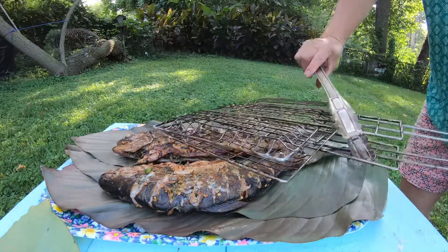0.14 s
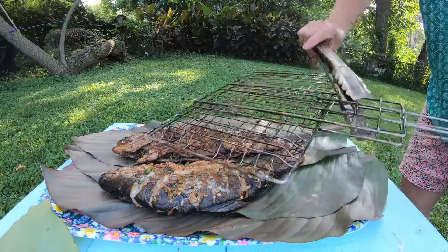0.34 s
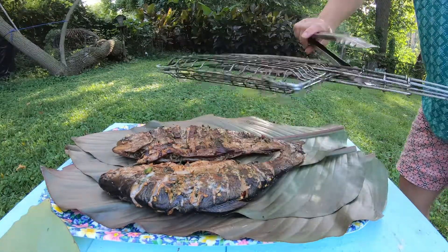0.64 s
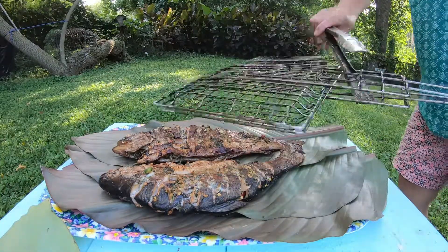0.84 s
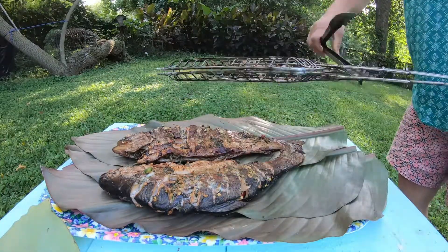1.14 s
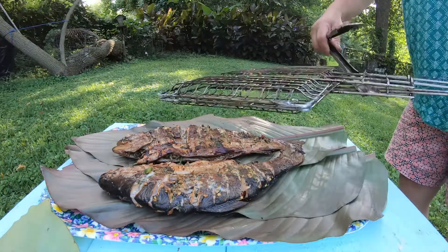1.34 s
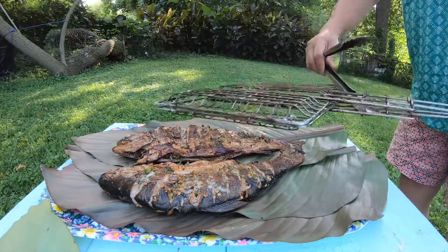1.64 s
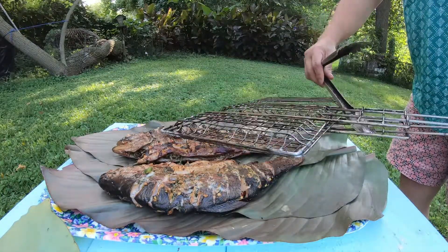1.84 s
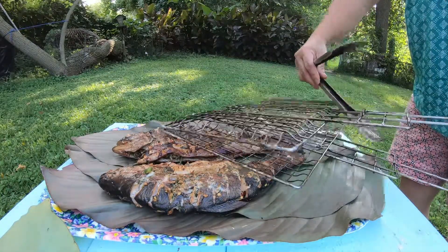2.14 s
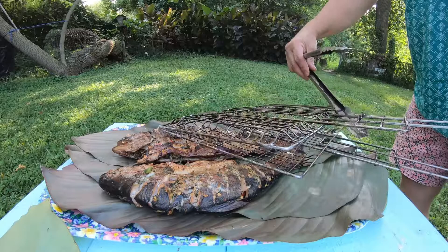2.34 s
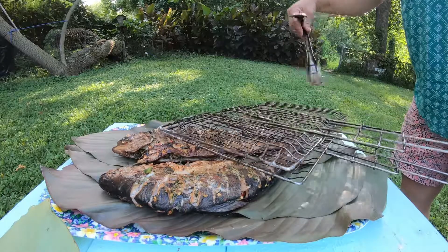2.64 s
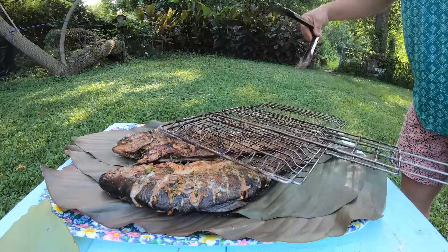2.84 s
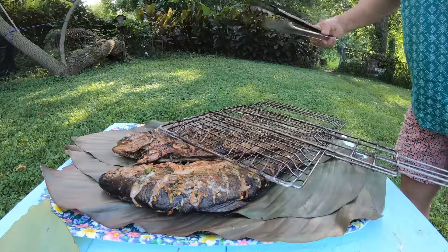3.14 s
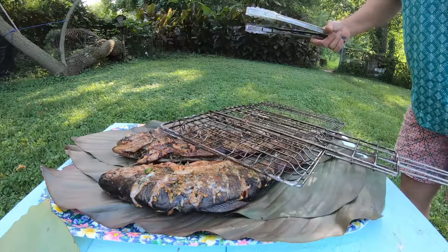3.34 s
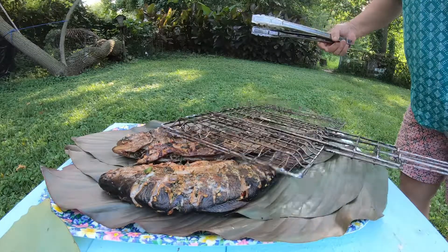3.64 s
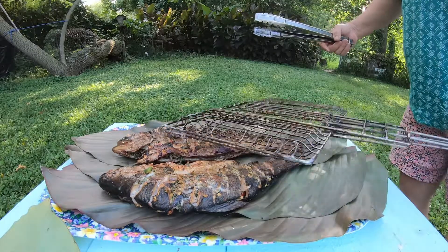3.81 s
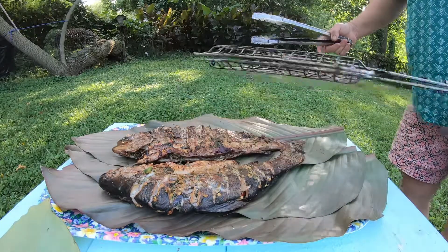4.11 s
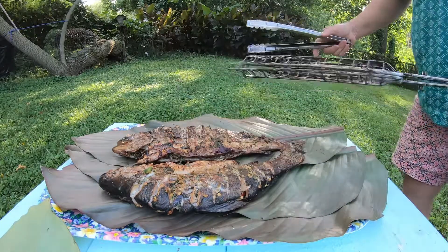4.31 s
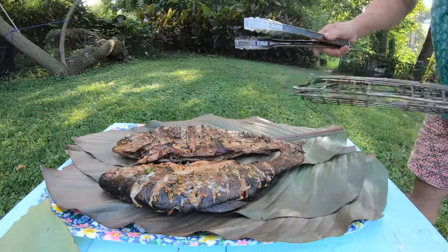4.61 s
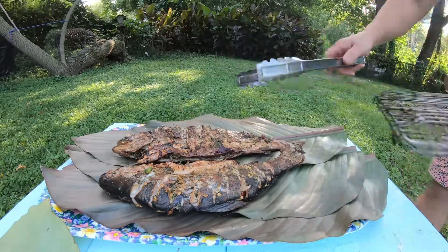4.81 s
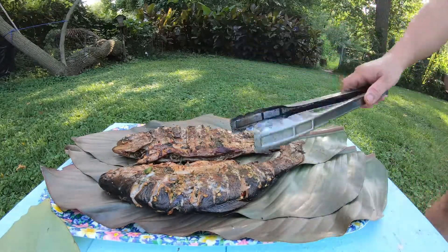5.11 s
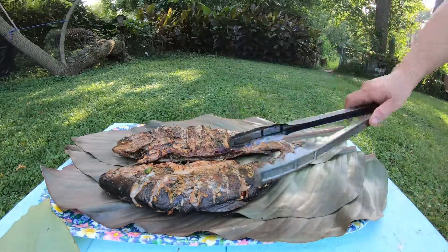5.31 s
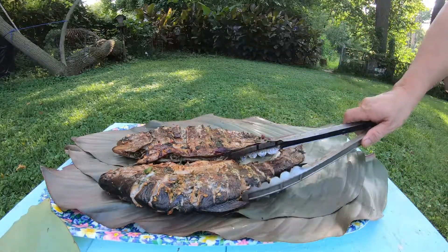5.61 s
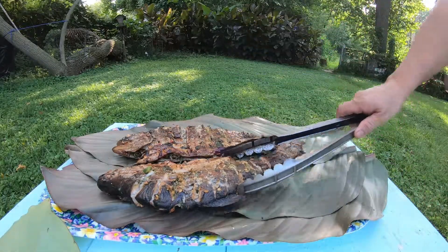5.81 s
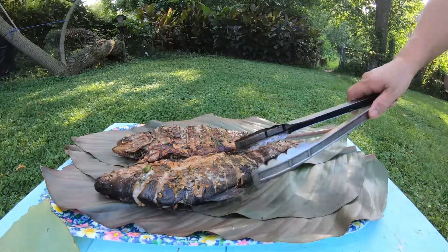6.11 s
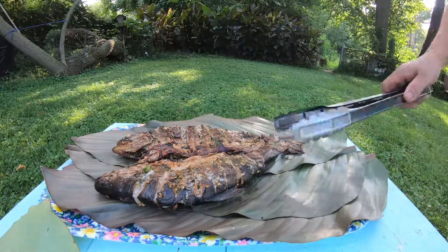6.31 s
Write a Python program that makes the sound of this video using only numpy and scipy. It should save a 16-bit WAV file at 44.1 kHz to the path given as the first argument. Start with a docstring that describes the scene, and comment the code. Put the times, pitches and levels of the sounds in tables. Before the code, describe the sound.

Outdoors on a lawn, a steady high insect drone and a nearer fast trill. Close by, steel tongs click and scrape dryly on a wire basket; around two seconds the basket drops with a rattling clank and a low table thump. Small ticks and leafy crackles follow, ending quietly.

```python
"""Steel tongs click and scrape on a wire grilling basket: noise bursts ring arm modes, stick-slip grit sings.
The basket clatters (knocks into wire modes), the table booms (decaying sines), and leaves and fish skin
crackle (shaped grains). Behind them a high insect chorus drones (coloured noise), a nearer insect trills
(swept sine), a low distant rumble lies under both, and gusts push on the microphone (low noise)."""
import sys
import numpy as np
from scipy import signal
from scipy.fft import rfft, irfft
from scipy.io import wavfile
from scipy.ndimage import uniform_filter1d

SR = 44100
rng = np.random.default_rng(int(sys.argv[2]) if len(sys.argv) > 2 else 0)


def persist_wave(psi):
    """Save psi, clipped to +-1, as 16-bit WAV."""
    counts = np.round(np.clip(psi, -1, 1) * 32767).astype(np.int16)
    wavfile.write(sys.argv[1], SR, np.atleast_2d(counts).T)


N = 284886
TIME = np.arange(N) / SR

# basket knocking and settling: t/s, relative level/dB, colour centre f/Hz, chatter decay/s
BASKET_KNOCKS = [(1.905, -36.5, 540, 0.036), (1.9484, -26, 2000, 0.038), (1.9706, -9, 2320, 0.0087),
                 (1.978, -15.5, 1760, 0.011), (1.988, -26, 1800, 0.041), (2.019, -18.5, 1710, 0.0081),
                 (2.022, -18.5, 11000, 0.014), (2.071, -29, 434, 0.01), (2.195, -35.5, 4220, 0.019),
                 (3.311, -31.5, 1500, 0.028), (3.514, -39.5, 1420, 0.026), (3.543, -29, 2260, 0.016),
                 (3.668, -27.5, 3450, 0.0064), (4.262, -48, 2480, 0.019)]
# steel response: f/Hz, relative level/dB
STEEL_RESPONSE = [(300, -9), (1200, -3.5), (2400, -6.5), (3600, -4.5), (4700, -4.5), (6500, -2), (8300, -1),
                  (10000, -4), (11500, -9.5), (13000, -9.5), (16000, -15)]


def undb(db):
    """Decibels to gain."""
    return 10 ** (np.asarray(db) / 20)


def unit(x):
    """Scale to rms 1."""
    return x / np.sqrt(np.mean(x ** 2))


def curve(rows, at=TIME, axis=1):
    """One table column, joined by straight lines."""
    rows = np.array(rows)
    return np.interp(at, rows[:, 0], rows[:, axis])


def over_hz(points):
    """A (f/Hz, value) table on every frequency bin, joined on a log axis."""
    hz, value = np.transpose(points)
    bins_hz = np.arange(N // 2 + 1) * SR / N
    return np.interp(np.log(bins_hz + 1), np.log(hz), value)


def tint(x, points):
    """Filter by a (f/Hz, level/dB) response."""
    return irfft(rfft(x) * undb(over_hz(points)), N)


def colour(x, points):
    """Filter by a (f/Hz, level/dB) response, then scale to rms 1."""
    return unit(tint(x, points))


def band(x, hz, width_hz):
    """One resonance, gain 1 at its centre."""
    hz = min(hz, SR * .45)
    b, a = signal.iirpeak(hz, hz / min(width_hz, SR / 3), fs=SR)
    return signal.lfilter(b, a, x)


def walk(rate_hz):
    """Slow chance: random levels joined by ramps, at rms 1."""
    levels = rng.standard_normal(int(N / SR * rate_hz) + 2)
    steps = np.repeat(levels, int(SR / rate_hz) + 1)
    return unit(uniform_filter1d(steps, int(SR / rate_hz))[:N])


def stereo_noise(likeness):
    """Noise whose left-right correlation depends on frequency."""
    alike = np.clip(over_hz(likeness), -1, 1)
    mid, side = rfft(rng.standard_normal((2, N))) * np.sqrt([1 + alike, 1 - alike])
    return irfft(np.array([mid + side, mid - side]), N)


def spread(pair, side_db, pan_db=0):
    """Middle and side signals to left and right; positive pan favours the left."""
    mid, side = pair[0], pair[1] * undb(side_db)
    return np.array([(mid + side) * undb(pan_db / 2), (mid - side) * undb(-pan_db / 2)])


def grains(shape, scatter_db):
    """Dense tiny contacts; a larger scatter makes a few far stronger than the rest."""
    noise = rng.standard_normal(shape)
    strength_db = scatter_db * np.minimum(rng.exponential(size=shape), 5)
    return unit(noise * undb(strength_db))


def swell(s, length_s, flatness):
    """Smooth rise and fall; flatness 2 is a bell, higher is flatter."""
    return np.exp(-np.abs(2 * (TIME - s) / length_s - 1) ** flatness / 2)


def push(s, length_s, attack_s, release_s):
    """Linear attack, hold and exponential release."""
    attack = np.clip((TIME - s) / attack_s, 0, 1)
    return attack * np.exp(-np.maximum(TIME - s - length_s, 0) / release_s)


def add(out, s, sound):
    """Mix a sound in at time s."""
    start = max(int(s * SR), 0)
    out[:, start:start + sound.shape[-1]] += sound[..., :N - start]


def ring(force, modes, ring_db):
    """The contact noise itself plus the decaying modes it excites."""
    t = TIME[:SR // 2]
    modal = sum(undb(db - 60 * t / t60_s) * np.cos(2 * np.pi * hz * t) for hz, db, t60_s in modes)
    response = modal * undb(ring_db) / np.linalg.norm(modal)
    return force + signal.fftconvolve(force, response[None], axes=1)[:, :N]


def blows(events, scatter_db, breadth, tail_db, tail_s):
    """Each blow is a burst of metal chatter that stops short and leaves a faint loose rattle."""
    out, t = np.zeros((2, N)), TIME[:SR // 6]
    for s, db, hz, decay_s in events:
        envelope = np.exp(-(t / decay_s) ** 3) + undb(tail_db) * np.exp(-t / tail_s)
        burst = band(grains((2, len(t)), scatter_db) * envelope, hz, hz * breadth)
        burst = band(burst, hz, 2 * hz * breadth)
        norm = np.linalg.norm(burst, axis=1, keepdims=True)
        add(out, s, undb(db) * burst * np.sqrt(decay_s * SR) / norm)
    return out


def distance():
    """Low-passed noise rumbles with a wavering narrow-band hum, under faint steady open air."""
    # spectrum: f/Hz, relative density/dB
    air_spectrum = [(20, -27.5), (35, -20), (55, -1.5), (90, 1), (125, 1.5), (160, -2.5), (230, -9.5),
                    (320, -19), (500, -31), (800, -20.5), (1030, -29.5), (1330, -26), (2300, -39.5),
                    (3600, -29), (6000, -35), (15000, -42)]
    # left-right likeness: f/Hz, correlation
    air_likeness = [(30, -0.51), (60, 1), (130, 0.96), (290, 0.83), (640, -0.24), (1400, -0.37),
                    (3100, 0.5), (8000, 1)]
    # rumble: t/s, relative level/dB
    rumble_level = [(0, -53.5), (1.7, -50), (3.8, -52), (4.2, -54.5), (5.2, -51.5), (6.46, -51.5)]
    air = colour(stereo_noise(air_likeness), air_spectrum)
    low = tint(air, [(200, 0), (500, -40)])
    hum = undb(-9.5) * unit(band(rng.standard_normal(N), 127.8, 2.6))
    rumble = (low + hum) * undb(curve(rumble_level) + 0.69 * walk(3.33))
    return rumble + undb(-50.5) * (air - low)


def breeze():
    """Light eddies push on the two microphone ports separately, more on the left."""
    # gusts: start/s, length/s, relative level/dB
    gusts = [(0, 0.28, -53), (.8, .9, -65), (3.004, 0.76, -57), (6.106, 0.71, -67)]
    calm_db = -74.5  # floor between gusts, relative
    eddies = colour(rng.standard_normal((2, N)), [(20, -4), (50, 3), (90, -3), (200, -15), (1000, -77)])
    strength = undb(calm_db) + sum(undb(db) * swell(s, length_s, 1.1) for s, length_s, db in gusts)
    return eddies * strength * undb(4.7 * walk(3.73) - 3.0) * undb([[1], [-5]])


def chorus():
    """Many far insects merge into a noise drone; narrow noise bands are single wavering singers."""
    # spectrum: f/Hz, relative density/dB
    chorus_spectrum = [(4000, -27), (4700, -20), (5000, -13), (5300, -14), (5600, -25.5), (6300, -16),
                       (6850, -14.5), (7150, -9.5), (7900, -2.5), (8500, -7.5), (8750, -14), (10000, -20.5),
                       (11200, -28.5), (14300, -29.5), (16000, -49)]
    # left-right likeness: f/Hz, correlation
    chorus_likeness = [(5000, 0.15), (6300, 0.38), (7200, 1), (8400, 0.89), (10000, 0.91), (12000, 0.47),
                       (15000, 0.62)]
    # swelling: t/s, relative level/dB
    chorus_level = [(0, -53), (.4, -54.5), (1.6, -53), (2.6, -54), (3.3, -52), (5.2, -52.5), (6.46, -51)]
    # singers standing out: f/Hz, relative level/dB
    singers = [(7340, -5), (7570, -9), (7660, 6), (7840, 1.5), (7957, -11), (8040, -14), (8140, -5.5),
               (8360, -1), (8520, 5)]
    voices = 0
    for hz, db in singers:
        voice = unit(band(band(rng.standard_normal(N), hz, 46), hz, 110))
        voices = voices + voice * undb(db + walk(3.35))
    drone = unit(stereo_noise(chorus_likeness)) + undb(-20.0) * unit(voices)
    level_db = curve(chorus_level) + 0.88 * walk(14)
    return colour(drone, chorus_spectrum) * undb(level_db) * undb([[-.5], [.5]])


def trill():
    """Each wing stroke is a short whistle that arches and drops as the scraper slows."""
    # song: t/s, relative level/dB, base f/Hz
    song = [(0, -59, 7250), (.7, -63, 7150), (1.7, -55.5, 7150), (2.1, -58, 7150), (2.7, -55, 7170),
            (3.35, -53, 7320), (4.05, -56, 7300), (4.3, -68, 7200), (5.0, -70, 7150), (5.4, -60.5, 7100),
            (5.9, -61.5, 7100), (6.3, -55.5, 7130)]
    # one wing stroke: share of cycle, relative level/dB, pitch ratio
    stroke = [(0, -30, .975), (.08, -3, .985), (.25, -1, 1.005), (.38, 1, .993), (.5, -7, .955),
              (.58, -14, .92), (.66, -40, .91), (1, -40, .975)]
    stroke_hz, first_stroke_s = 25.68, .01
    cycle = (stroke_hz * (TIME - first_stroke_s) + .025 * walk(12)) % 1
    hz = curve(song, axis=2) * curve(stroke, cycle, axis=2) * (1 + .005 * walk(500))
    level_db = curve(song) + curve(stroke, cycle) + 0.9 * walk(25) + 2 * walk(300)
    return undb(level_db) * unit(np.sin(2 * np.pi * np.cumsum(hz) / SR))


def leaves():
    """Rubbed leaves and fish skin crackle in uneven little slips; basket knocks stir them too."""
    # spectrum: f/Hz, relative density/dB
    leaf_spectrum = [(200, -7), (420, 3), (600, -8), (1100, 2), (1800, 1), (3000, 2), (4500, -4),
                     (10000, -8.5), (16000, -47)]
    # rubs: start/s, length/s, relative level/dB
    rubs = [(0, 0.14, -57.5), (0.214, 0.11, -53), (0.738, 0.27, -57), (1.764, 0.019, -58),
            (2.08, 0.43, -62), (3.606, 0.065, -58), (3.977, 0.18, -62), (4.501, 0.1, -59.5),
            (5.005, 0.35, -58), (5.692, .33, -60.5), (5.792, 0.047, -49.5), (6.174, 0.25, -57)]
    # rustle after a 0 dB knock, its dB per dB of knock, its release
    stir_db, stir_growth, stir_decay_s = -40.5, 0.34, 0.029
    rubbed = sum((undb(db) * swell(s, length_s, flatness=2.8)) ** 2 for s, length_s, db in rubs)
    stirred = 0
    for s, db, _, decay_s in BASKET_KNOCKS:
        stir = undb(stir_db + stir_growth * db) * push(s, decay_s, decay_s, stir_decay_s)
        stirred = stirred + stir ** 2
    fractures = undb(2.5 * walk(900))
    crackle = colour(grains((2, N), scatter_db=1.5) * fractures, leaf_spectrum)
    strength = np.sqrt(rubbed + stirred) * undb(walk(70) - 3.0)
    return spread(crackle, side_db=-1.5, pan_db=-6.5) * strength


def table():
    """The table top booms under the basket as decaying sines, mostly on the left."""
    # thumps: t/s, relative level/dB, f/Hz, t60/s
    thumps = [(1.903, -34.5, 303, 0.051), (1.974, -36, 234, 0.039), (1.984, -38, 119, 1),
              (2.019, -17.5, 71, 0.074), (2.036, -26, 49.2, 0.5), (2.074, -28, 208, 0.091),
              (3.669, -34.5, 248, 0.036)]
    out, t = np.zeros((2, N)), TIME[:SR // 2]
    for s, db, hz, t60_s in thumps:
        swing = np.sin(2 * np.pi * hz * t - np.array([[0], [1.2]]))  # right lags, rad
        attack = np.minimum(t * hz, 1)  # one cycle
        add(out, s, undb(db - 60 * t / t60_s) * swing * attack)
    return out * undb([[0], [-7]])


def basket():
    """Duller knocks set the many wires of the grid clattering."""
    # wire modes: f/Hz, relative level/dB, t60/s
    basket_modes = [(443, 0, .11), (579, -3, .12), (707, -5, .13), (1084, -9, .17), (1286, -10, .13),
                    (1542, -5, .14), (1590, -5, .13), (1656, -2, .14), (1724, 1, .14), (1918, 0, .14),
                    (2011, -3, .11), (2115, -1, .12), (2373, -6, .08), (2561, -8, .11), (2784, -8, .12),
                    (3316, 1, .05), (3473, -6, .08), (4640, -7, .04)]
    # grid response: f/Hz, relative level/dB
    grid_response = [(150, 16), (420, 5), (600, -4.5), (820, -3), (1080, 2.5), (1300, -2.5), (1600, -3),
                     (1950, -4.5), (2700, 1), (3400, 2), (4000, -3), (5500, -10.5), (8000, -3.5),
                     (11000, -7), (16000, -27)]
    knocks = undb(-16.0) * blows(BASKET_KNOCKS, scatter_db=0.0, breadth=1.77, tail_db=-37, tail_s=0.017)
    clatter = ring(knocks, basket_modes, ring_db=-9)
    return spread(tint(clatter, grid_response), side_db=-9, pan_db=-2.5)


def sliding():
    """Steel sticks and slips in gritty steps; slips make it sing, and random snags tick."""
    # slides: start/s, length/s, relative level/dB, singing relative to grit/dB
    slides = [(0, 0.0072, -53, -25), (0.198, 0.048, -49.5, -20), (0.252, 0.032, -54, -20),
              (0.286, 0.096, -60, -13), (0.492, .1, -57.5, -25), (0.668, 0.21, -62, -17),
              (0.826, 0.12, -53.5, -24), (2.264, .07, -52, -2), (2.347, 0.08, -50.5, -4),
              (5.729, 0.032, -52.5, -0.5), (5.768, 0.034, -57.5, 1.5), (5.85, 0.19, -66, -6)]
    attack_s, release_s = 0.0045, 0.014
    snags_per_s, snag_decay_s, snag_db = 110, 0.006, -6.5
    pushes = np.array([undb(db) * push(s, length_s, attack_s, release_s) for s, length_s, db, _ in slides])
    pressure = np.linalg.norm(pushes, axis=0)
    song = np.linalg.norm(pushes * undb(np.array(slides)[:, 3:]), axis=0)
    slips = grains((2, N), scatter_db=3.5) * undb(3.1 * walk(160))
    grit = colour(band(slips, 3060, 5500), STEEL_RESPONSE) * pressure
    singing = unit(band(band(slips, 3180, 440), 3480, 1050)) * song
    catches = rng.random(N) < snags_per_s / SR
    snags = signal.lfilter([1], [1, -np.exp(-1 / (snag_decay_s * SR))], catches)
    ticks = colour(band(slips * snags, 3600, 5000), STEEL_RESPONSE) * pressure
    return spread(grit + singing + undb(snag_db) * ticks, side_db=-10.0)


def tongs():
    """Sharp, dry clicks on wire ring the sheet-steel arms; the hand damps them quickly."""
    # clicks: t/s, relative level/dB, colour centre f/Hz, chatter decay/s
    click_events = [(.1105, -29, 5970, 0.0055), (.2064, -25, 6030, 0.0076), (.2472, -9, 3020, 0.0032),
                    (.2493, -9, 7900, 0.0041), (.256, -30.5, 2200, 0.011), (.3217, -23.5, 2800, .002),
                    (.4906, -25.5, 4300, 0.0059), (.572, -35.5, 11000, .004), (.7452, -26.5, 3860, 0.0031),
                    (.7948, -23.5, 7000, 0.0035), (.849, -28, 6030, 0.0044), (.856, -21, 6800, .0035),
                    (.9143, -25, 4570, 0.0029), (.9474, -24, 7000, .004), (.9535, -21, 7150, 0.0048),
                    (1.1012, -28, 7200, 0.0094), (1.164, -37, 7500, 0.0095), (1.224, -32, 7700, 0.0032),
                    (2.375, -30.5, 4500, 0.0056), (2.405, -29.5, 4000, 0.0043), (2.424, -31.5, 4900, 0.003),
                    (3.16, -32.5, 8200, 0.0053), (3.313, -29.5, 11500, 0.0093),
                    (3.542, -29.5, 5840, 0.0049), (5.363, -36, 2230, 0.002), (5.4895, -39.5, 3560, 0.017),
                    (5.545, -38.5, 7900, 0.013), (5.809, -32.5, 2370, .02), (5.9538, -29.5, 3020, 0.0028)]
    # arm modes: f/Hz, relative level/dB, t60/s
    tong_modes = [(2030, -4, .06), (2395, -1, .045), (2600, -6, .04), (3366, -1, .05), (3672, -2, .04),
                  (5433, -4, .025), (7057, -5, .025), (8190, 4, .022), (9853, -5, .02), (12800, -7, .02)]
    clicks = blows(click_events, scatter_db=2.4, breadth=1.3, tail_db=-24, tail_s=.016)
    ringing = ring(clicks, tong_modes, ring_db=-10.0)
    return undb(-9.5) * spread(tint(ringing, STEEL_RESPONSE), side_db=-6, pan_db=-0.5)


def scene():
    """The lawn and the work at the table."""
    lawn = chorus() + trill() + distance() + breeze()
    return lawn + tongs() + sliding() + basket() + table() + leaves()


def record(dry):
    """A steep elliptic low-pass removes the top of the band."""
    top_hz = 15800
    sos = signal.ellip(10, .2, 70, top_hz, fs=SR, output="sos")  # ripple/dB, stop-band/dB
    return signal.sosfilt(sos, dry)


dry = scene()
out = record(dry)
persist_wave(out)
```